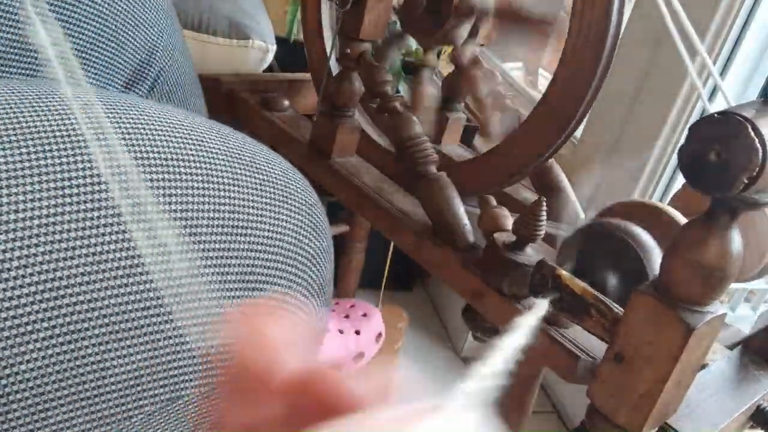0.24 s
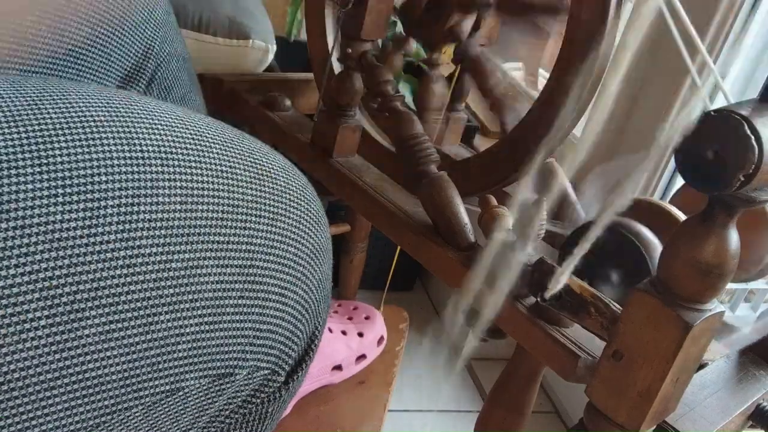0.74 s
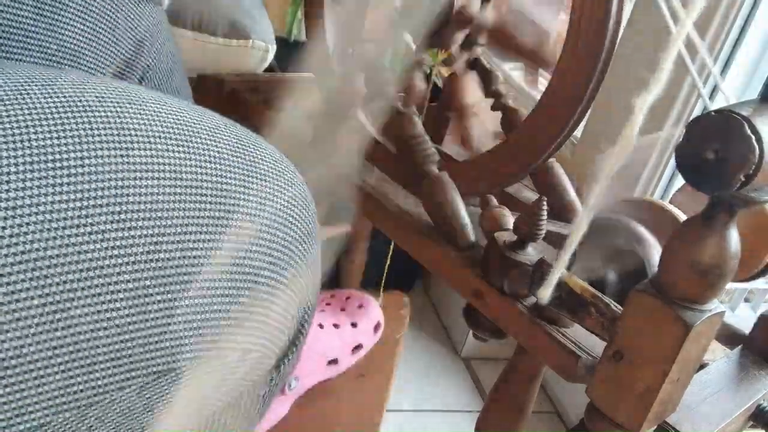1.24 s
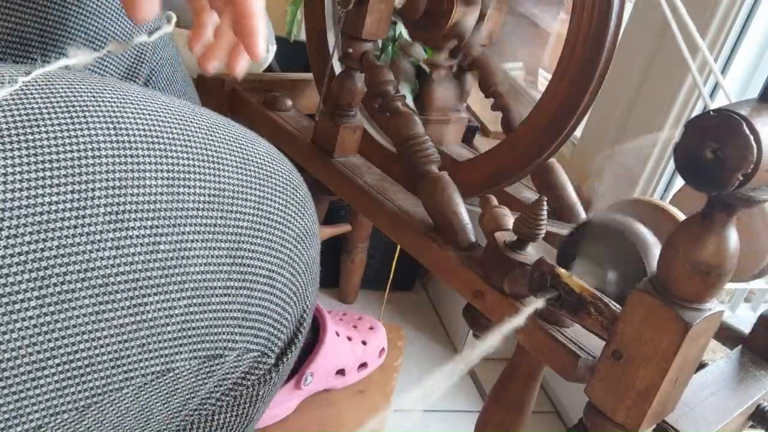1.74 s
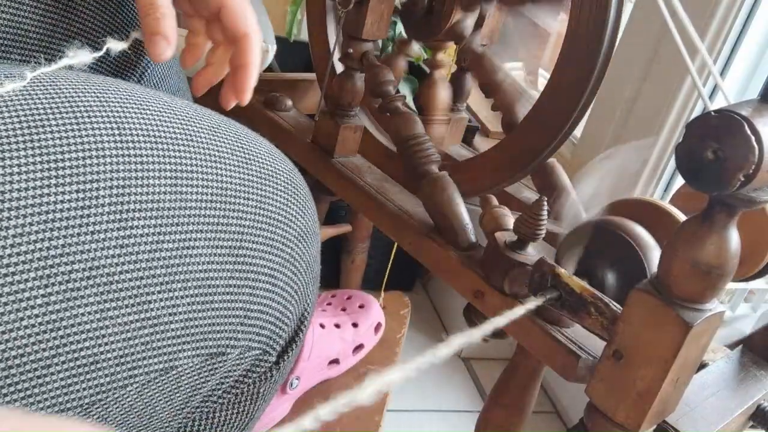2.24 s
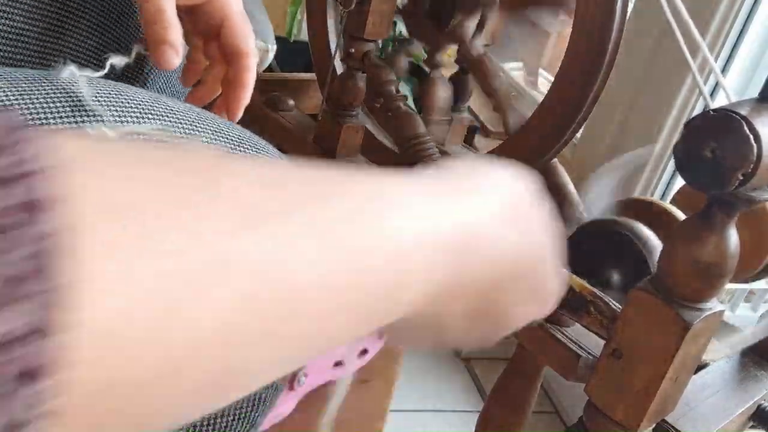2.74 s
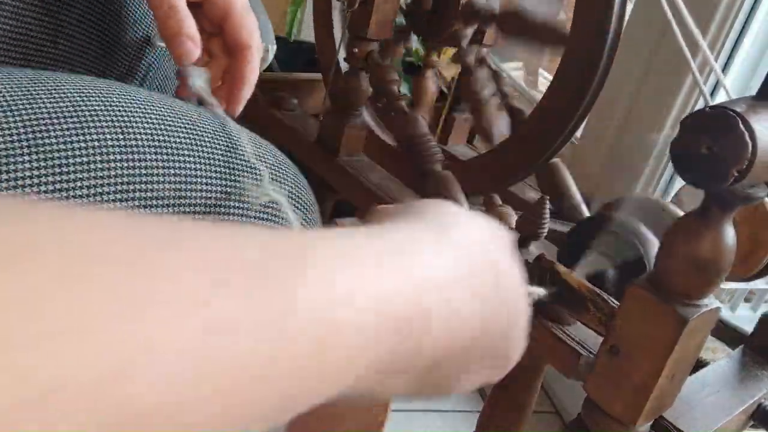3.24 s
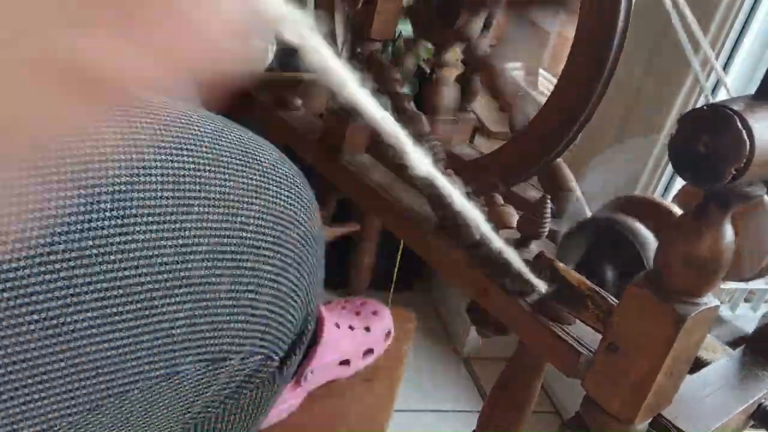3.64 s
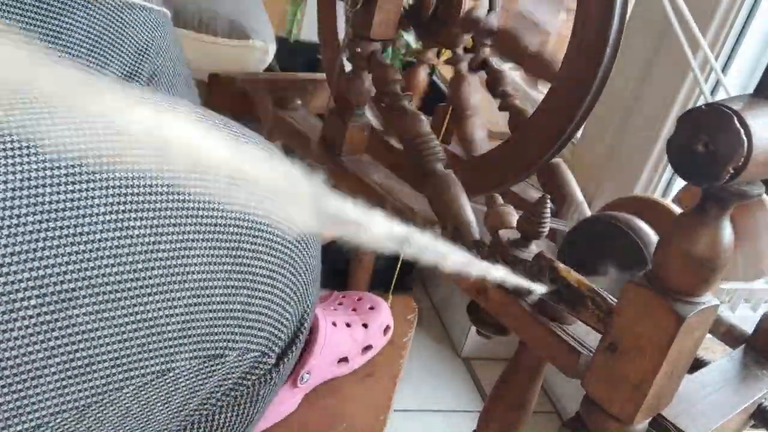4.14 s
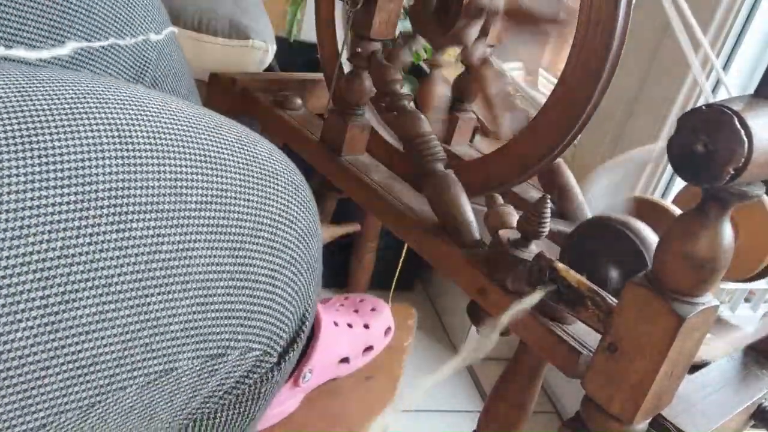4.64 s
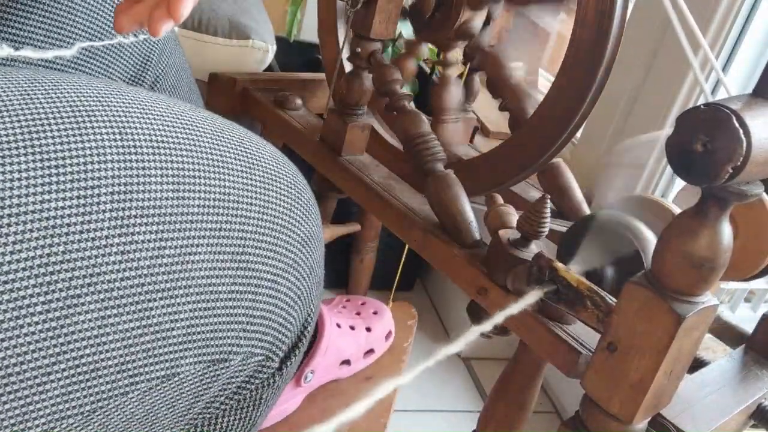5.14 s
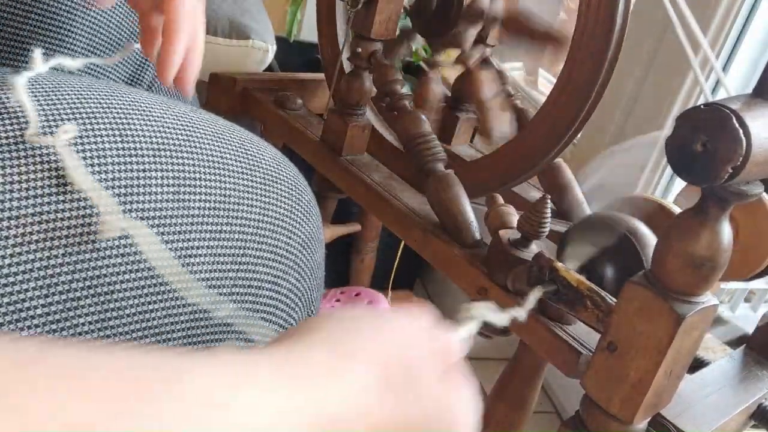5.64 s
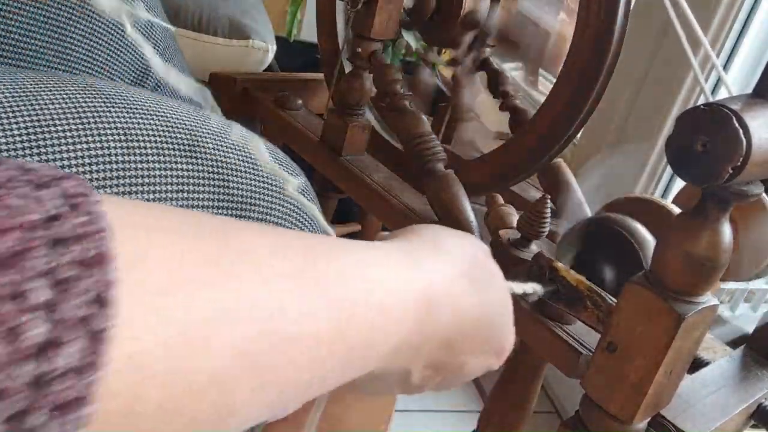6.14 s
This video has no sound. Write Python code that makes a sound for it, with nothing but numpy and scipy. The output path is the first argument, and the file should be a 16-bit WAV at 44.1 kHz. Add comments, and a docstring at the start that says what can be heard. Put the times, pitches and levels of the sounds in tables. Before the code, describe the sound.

A wooden treadle spinning wheel clatters unevenly indoors, with hollow knocks, sharp metal ticks, a low throbbing hum and soft yarn hiss.

```python
"""Wooden knocks, bright ticks, a throbbing hum and hissing yarn: a treadle spinning wheel in a small room.
Flyer and bobbin knock and metal fittings tick as impacts whose random bounces excite resonant modes.
Yarn hiss, bobbin rattle and frame rumble are friction noise, shaped by body or colour and paced by the treadle.
Narrow noise makes the frame hum, slow swings make thuds, and a wavering tone is a bearing that sings once.
Short room reflections follow the knocks and ticks; a quiet rumble of the house lies beneath."""
import sys
import numpy as np
from scipy import signal
from scipy.fft import rfft, irfft
from scipy.io import wavfile
from scipy.ndimage import uniform_filter1d

SR = 44100
rng = np.random.default_rng(int(sys.argv[2]) if len(sys.argv) > 2 else 0)


def dump_mix(stems):
    """Bounce the given channels to the path in sys.argv[1] as a 16-bit WAV at rate SR."""
    frames = np.atleast_2d(stems).T  # one column per channel
    limited = np.clip(frames, -1, 1)  # hard clip at full scale
    pcm = np.round(limited * 32767).astype(np.int16)
    wavfile.write(sys.argv[1], SR, pcm)


N = 282240
T = np.arange(N) / SR
SIZE = 16384  # filter length in samples
FREQS = np.maximum(np.fft.rfftfreq(SIZE, 1 / SR), 1)

# resonances of flyer and bobbin: centre_hz, width_hz, level_db (relative)
FLYER_MODES = [(423, 230, -9), (677, 67, -4.5), (865, 84, 4.5), (1110, 224, 2.5), (1282, 130, 2.5),
               (1600, 22, -6), (1745, 125, 3), (1901, 38, 4), (2106, 130, 5), (2276, 180, -0.5),
               (2522, 176, 5), (2840, 230, -2), (3240, 220, -5), (3490, 110, -1), (3890, 160, -2),
               (4260, 310, -3.5)]
# resonances of the wooden frame: centre_hz, width_hz, level_db (relative)
FRAME_MODES = [(157, 9.5, -11.5), (212.4, 17, -6), (276.1, 2.6, 7.5), (311.4, 20.5, 2), (370, 17, -3.5),
               (397.8, 17.5, 5), (424.5, 36, -1)]
# pushes of the treadle, one per turn of the wheel; levels before sag and throb:
# start_s (before lead), rise_s, length_s, rattle_db (bobbin), rumble_db (frame), hiss_db (yarn)
STROKES = [(-0.1, 0.13, 0.54, -49.5, -61, -45.5), (0.717, 0.32, 1, -48, -57, -44.5),
           (1.701, 0.11, 0.23, -51, -61, -47), (2.393, 0.2, 0.58, -51, -54, -48),
           (3.302, 0.23, 0.75, -46.5, -63, -40), (4.216, 0.17, 0.79, -51.5, -58.5, -52),
           (5.086, 0.28, 1, -52.5, -57.5, -49.5), (5.931, 0.39, 0.6, -51, -58.5, -48.5)]
FLYER_TURNS_PER_S = 9.2  # mean speed


def undb(db):
    """Level law: decibels to amplitude gain."""
    return 10 ** (np.asarray(db) / 20)


def unit(x):
    """Normalisation: scale to an rms of one."""
    return x / np.sqrt(np.mean(x ** 2))


def curve(table, axis=1):
    """Linear interpolation: one column of a time table at every sample."""
    rows = np.array(table)
    return np.interp(T, rows[:, 0], rows[:, axis])


def colour(points, axis=1):
    """Spectral envelope: gain from (Hz, dB) points, interpolated over log frequency."""
    rows = np.array(points)
    return undb(np.interp(np.log(FREQS), np.log(rows[:, 0]), rows[:, axis]))


def resonances(modes):
    """Modal superposition: gain of a body whose damped modes add in power."""
    power = 0
    for hz, width, db in modes:
        detuning = (FREQS ** 2 - hz ** 2) / (FREQS * width)
        power = power + undb(db) ** 2 / (1 + detuning ** 2)
    return np.sqrt(power)


def struck(modes):
    """Modal excitation: each blow lands elsewhere, favouring other modes and shifting them slightly."""
    spread_db, detune_share = 1.8, 0.0074
    chance = rng.standard_normal((len(modes), 2))
    varied = []
    for (hz, width, db), (shift, favour) in zip(modes, chance):
        varied.append((hz * (1 + detune_share * shift), width, db + spread_db * favour))
    return resonances(varied)


def ring(x, gain):
    """Causality: a minimum-phase filter with the given gain rings only after it is struck."""
    # folding the cepstrum onto positive time gives the minimum phase
    cepstrum = irfft(np.log(gain + 1e-6))[:SIZE // 2]
    cepstrum[1:] *= 2
    response = irfft(np.exp(rfft(cepstrum, SIZE)))[:SIZE // 2]
    return signal.fftconvolve(x, response[None], axes=1)[:, :x.shape[1]]


def walk(rate):
    """Random modulation: smooth wander, about `rate` new values a second, with a spread near one."""
    k = int(SR / rate)
    steps = np.repeat(rng.standard_normal(N // k + 1), k)
    return unit(uniform_filter1d(steps, k)[:N])


def add(track, s, sound):
    """Superposition: mix a sound into a track at a time in seconds."""
    i = np.clip(int(s * SR), 0, N)
    track[:, i:i + sound.shape[1]] += sound[:, :N - i]


def contact(rise_s, t60, bounce_rate, scatter_t60, direct):
    """Impact: a loose part lands and chatters in random, fading bounces; each sounds direct, then scattered."""
    port_lag_s = 0.00013  # the direct sound reaches the left port first
    t = T[:SIZE // 4]
    bounces = (rng.random(len(t)) < bounce_rate / SR) * rng.standard_normal(len(t)) * 0.5
    bounces = bounces * np.exp(-np.log(1000) * t / t60)
    bounces[0] = 1
    growth = 1 - np.exp(-t / rise_s)
    decay = np.exp(-np.log(1000) * t / scatter_t60)
    scatter = unit(rng.standard_normal((2, len(t))) * growth * decay)
    scatter[0, 0] += direct * np.sqrt(len(t))
    scatter[1, int(port_lag_s * SR)] += direct * np.sqrt(len(t))
    return signal.fftconvolve(scatter, bounces[None], axes=1)[:, :len(t)]


def blow(x, db):
    """Impact energy: give a blow the energy of that level held for ten milliseconds."""
    return x * undb(db) / np.sqrt(np.sum(x ** 2) / (SR / 100))


def friction(rate, spread_db, t60, smooth):
    """Friction: noise swells with countless tiny slips of unequal size over a smooth rub."""
    sizes = undb(spread_db * np.minimum(rng.exponential(size=N), 4))
    slips = (rng.random(N) < rate / SR) * sizes
    decay = np.exp(-2 * np.log(1000) * T[:SIZE // 4] / t60)
    power = signal.fftconvolve(slips ** 2, decay)[:N]
    return rng.standard_normal((2, N)) * np.sqrt(np.abs(power / power.mean()) + abs(smooth))


def treadle(levels_db, coast_db, sag_db_per_s, lead_s):
    """Forced drive: gain swells with each push, sags, then falls to the coasting level at release."""
    release_db_per_s = 109  # further fall once the foot lets up
    power = undb(coast_db) ** 2
    for (s, rise_s, length_s, *_), db in zip(STROKES, levels_db):
        t = T - s + lead_s
        sag_db = sag_db_per_s * np.maximum(t - rise_s, 0)
        fade_db = sag_db + release_db_per_s * np.maximum(T - s - length_s, 0)
        power = power + (np.clip(t / rise_s, 0, 1) * undb(db - fade_db)) ** 2
    return np.sqrt(power)


def looseness():
    """Driven play: how hard the bobbin shakes on its spindle, as a gain."""
    return treadle([row[3] for row in STROKES], coast_db=-61.5, sag_db_per_s=24, lead_s=0.0059)


def wobble():
    """Rotating imbalance: the swing of the flyer, between -1 and 1 once a turn, at a wandering speed."""
    speed = FLYER_TURNS_PER_S * (1 + 0.1123 * walk(4.04))
    return np.sin(2 * np.pi * np.cumsum(speed) / SR)


def knocks():
    """Impact on modes: flyer and bobbin hit the ends of their play, chatter, rebound and wake the frame."""
    # wooden knocks in the bearings:
    # start_s, level_db, body_db (low body), edge_db (hard edge), frame_db (level of the frame's ring)
    knock_rows = [(0.017, -49, 7, -4, -57), (0.066, -47.5, 2.0, 2.5, -54), (0.116, -45.5, 6, -5, -45),
                  (0.1752, -40, 11, -8, -57), (0.199, -40.5, 1, -4, -52), (0.241, -46.5, 9, -4.5, -57),
                  (0.3425, -39.5, 7.0, 3, -56), (0.41, -45, -1.5, 2, -59), (0.4582, -43.5, 2.5, -5, -53.0),
                  (0.532, -49, 16, -6, -52.5), (0.8426, -33, 1, 4, -42), (0.895, -43, -2, -4, -53),
                  (0.9462, -25, -7, -0.5, -40), (0.9895, -30, -0.0, 0.0, -44.5),
                  (1.0378, -25.5, -7.5, -1, -50), (1.08, -31, -7.5, 2.5, -43), (1.135, -21, -14, -3, -47),
                  (1.1835, -32.5, -5, 4, -44.0), (1.2451, -26.5, 0, -1.5, -49),
                  (1.3025, -31.5, 2, 2.5, -52), (1.3778, -26.5, -3.5, -2, -44.5),
                  (1.747, -28.5, 2.5, -1.5, -45.0), (1.8132, -39.5, 1, 3, -48), (1.8418, -38, 3.0, 2, -59),
                  (1.888, -39, 2, 6, -56), (1.9061, -35.5, 4, -3.5, -47.5), (1.9444, -39.5, -5, -16, -55),
                  (2.0101, -44, 19, -0.5, -47), (2.0646, -24, -12.5, -2.5, -48), (2.0956, -39, 0, 8, -46),
                  (2.3531, -45, 12, -4.0, -49.5), (2.5874, -34, 3, 3, -40), (2.657, -31, 1, -1, -46),
                  (2.7599, -32, -3.0, -17, -42), (2.8182, -27.5, -5.5, 2, -48), (2.9161, -41, 8, -6, -51),
                  (2.9861, -41.5, 3.0, -10, -52), (3.3481, -44, 0, -11, -58), (3.3751, -28, -3, -2, -50.0),
                  (3.461, -36.5, -3, -11, -47.5), (3.524, -35.5, 2, 2, -44.5),
                  (3.5549, -33.5, 0, -3.0, -53), (3.604, -35.5, 9, -2, -52), (3.6418, -37, 0, 2, -53),
                  (3.6704, -26, -7, -2, -47.5), (3.7158, -37.0, 1, -3.0, -45.5),
                  (3.7726, -24.5, -2, -4, -44.0), (3.8276, -29, -6, 0.5, -51),
                  (3.8939, -24, -3, -3.5, -40.5), (3.9607, -28.5, -6, 1, -49),
                  (4.0465, -30.5, 5.5, -5, -49), (4.1356, -35.5, 1, -1, -57),
                  (4.2524, -30.5, 2.5, -11, -50), (4.3412, -40.5, -1, 0.0, -56), (4.378, -42, -1, 4, -55),
                  (4.4188, -40, 3, -5, -51), (4.496, -30, -0.5, -3, -44.5), (4.5724, -44, 6, 7, -52),
                  (4.632, -26, -6, 0, -46.5), (4.7055, -41.0, 0, -9, -53), (4.7947, -36.5, 4.5, -6, -50.5),
                  (5.0836, -36, 5.5, -6, -49), (5.21, -38.5, 5.5, -4, -46.5), (5.298, -43, -2, -7, -66),
                  (5.4, -47, 11, 0, -47.5), (5.4479, -34.5, 1, 4, -51), (5.5051, -32.5, 0, -1.5, -52),
                  (5.5815, -40, 5.5, -6.0, -44), (5.6215, -44.5, 3.5, 0, -45), (5.7757, -33, -10.5, 1, -51),
                  (5.816, -37, 4.0, 1.5, -46.5), (5.9901, -31.5, -2, -3, -59),
                  (6.1, -40.0, 10, -1.0, -45.5), (6.2078, -40.5, 0, 0.5, -49.5),
                  (6.277, -32.5, -3.5, -4, -46), (6.3178, -40, 3.5, 9, -58), (6.383, -34.5, -8, -10.5, -52)]
    chatter_spread = 0.25  # log spread of the chatter time
    rebound_s, rebound_db = 0.022, -16  # mean wait, level relative to the knock
    out = np.zeros((2, N))
    frame_gain = resonances(FRAME_MODES) * colour([(450, -1), (1500, -22.5)])
    for s, db, body_db, edge_db, frame_db in knock_rows + taps():
        hardness = colour([
            (300, min(body_db, 0) - 7), (700, body_db - 2), (1250, body_db), (1650, -0.5), (2300, 1),
            (2900, 0.5), (3800, edge_db - 0.5), (6000, edge_db - 2.5), (11000, -8)])
        linger = np.exp(chatter_spread * rng.standard_normal())
        hit = contact(rise_s=0.00048, t60=0.029 * linger, bounce_rate=500,
                      scatter_t60=0.031 * linger, direct=0.55)
        wood = ring(hit, (struck(FLYER_MODES) + undb(-18.5)) * hardness)
        add(out, s, blow(wood, db))
        rebound = ring(hit, struck(FLYER_MODES) + undb(-17))
        add(out, s + rebound_s * (0.5 + rng.random()), blow(rebound, db + rebound_db))
        add(out, s, blow(ring(hit, frame_gain), frame_db))
    return out


def taps():
    """Rotating contact: knock rows of light taps, about one a flyer turn, as loud as the play allows."""
    tap_db = 3  # over the rattle
    count = int(N / SR * FLYER_TURNS_PER_S)
    turns = np.arange(count) + 0.5 + 0.27 * rng.standard_normal(count)
    times = np.clip(turns / FLYER_TURNS_PER_S, 0, T[-1])
    levels = 20 * np.log10(np.interp(times, T, looseness())) + tap_db
    return [(s, db, 0, -3, db - 12) for s, db in zip(times, levels)]


def ticks():
    """Hard impact: metal spindle and hooks snap on their seats, short and bright, with a trace of ring."""
    # ticks, often just before the wood lands: start_s, level_db
    tick_rows = [(0.011, -31.5), (0.1027, -34), (0.1112, -24.5), (0.1974, -31), (0.291, -31), (0.38, -33.5),
                 (0.3844, -29.5), (0.527, -32.5), (0.685, -34), (0.9455, -35.5), (1.033, -38), (1.077, -30),
                 (1.104, -36.5), (1.1337, -32), (1.152, -33.5), (1.1802, -30.5), (1.2986, -30),
                 (1.4503, -33.5), (1.8908, -40), (2.002, -29.5), (2.0615, -28.5), (2.122, -37.5),
                 (2.2695, -34.5), (2.423, -43.5), (2.464, -28.5), (2.5846, -25.5), (2.7561, -26),
                 (2.814, -33.5), (2.8434, -29), (3.172, -35.5), (3.296, -42.5), (3.371, -31), (3.441, -37),
                 (3.458, -29.5), (3.6663, -33), (3.7123, -35), (3.7682, -27.5), (3.822, -26.5),
                 (3.8886, -28.5), (3.956, -25.5), (4.041, -32.5), (4.13, -31.5), (4.2457, -34.5),
                 (4.3376, -36.5), (4.4223, -37), (4.4911, -28), (4.6179, -29), (4.631, -33), (4.844, -45.5),
                 (5.397, -27), (5.4547, -37), (5.506, -43), (5.6629, -30), (5.697, -33.0), (5.771, -31.5),
                 (6.3195, -41)]
    # resonances of the metal fittings: centre_hz, width_hz, level_db (relative)
    metal_modes = [(6220, 360, 5.5), (8700, 79, 3), (8640, 62, -14), (9130, 22, 12), (10550, 330, 6.5),
                   (11800, 230, -2)]
    # spectrum of the snap: frequency_hz, level_db (relative)
    snap_colour = [(200, -20), (1000, -15.5), (3000, -8), (5000, -5), (7000, -3.5), (8500, 2.5), (12000, 5),
                   (15000, -4.5)]
    out = np.zeros((2, N))
    for s, db in tick_rows:
        hit = contact(rise_s=.0005, t60=.028, bounce_rate=500, scatter_t60=.018, direct=.36)
        # a flat floor below the modes keeps the snap stronger than most of its ring
        metal = np.hypot(struck(metal_modes), undb(6.0))
        add(out, s, blow(ring(hit, colour(snap_colour) * metal), db))
    return out


def yarn(flyer):
    """Sliding friction: twisting wool hisses through orifice and hooks, louder with each push and turn."""
    # spectrum of the hiss: frequency_hz, level_db (relative)
    hiss_colour = [(1000, -26), (3000, 0), (5000, 0), (7000, 3), (8800, 4.5), (12000, 8.5), (15000, 0)]
    scrape_db = 2.5  # swing of the level, once a turn of the flyer
    fibres = friction(rate=240, spread_db=2.6, t60=0.1, smooth=0.6)
    pull = treadle([row[5] for row in STROKES], coast_db=-56.0, sag_db_per_s=19.0, lead_s=0.049)
    return unit(ring(fibres, colour(hiss_colour))) * pull * undb(scrape_db * flyer)


def bobbin():
    """Friction on modes: the bobbin rattles lightly on its spindle between the knocks."""
    rattle = friction(rate=120, spread_db=4.5, t60=0.05, smooth=0.086)
    return unit(ring(rattle, resonances(FLYER_MODES) + undb(-25.5))) * looseness()


def frame(flyer):
    """Forced vibration: rolling friction rumbles through the frame, whose low sway hums with each push."""
    # low sway, its gain squared below: centre_hz, width_hz, level_db (relative, before squaring)
    sway_modes = [(95, 15, -1.5), (109.7, 9.8, 3.5)]
    hum_db, hum_coast_db = -64, -73  # under the foot and between pushes, before sag and throb
    throb_db, rumble_throb_db = 2.5, 2.5  # swing of hum and rumble, once a turn of the flyer
    roll = friction(rate=510, spread_db=4.5, t60=0.047, smooth=0.19)
    rumble = unit(ring(roll, resonances(FRAME_MODES)))
    sway = signal.hilbert(ring(rng.standard_normal((1, N)), resonances(sway_modes) ** 2))
    # the drive keeps the swing nearly even while its pitch wavers
    hum = unit(sway.real / (np.abs(sway) + 1.1 * sway.real.std()))
    load = treadle([row[4] for row in STROKES], coast_db=-67.5, sag_db_per_s=11.5, lead_s=0.0025)
    swing = treadle([hum_db] * len(STROKES), coast_db=hum_coast_db, sag_db_per_s=7.5, lead_s=0.0088)
    throbbing_rumble = rumble * load * undb(rumble_throb_db * (flyer - 1.5))
    return throbbing_rumble + hum * swing * undb(throb_db * flyer)


def thuds():
    """Damped oscillation: treadle and unbalanced flyer rock the frame in slow swings that swell and die."""
    # low thuds: start_s, level_db (rms at the widest swing)
    thud_rows = [(0.105, -56), (0.295, -56), (0.405, -53), (0.525, -58), (0.89, -53), (0.94, -56),
                 (1.01, -52.5), (1.177, -59), (1.245, -57), (1.365, -60), (1.454, -51.5), (1.743, -49.5),
                 (1.82, -60), (1.995, -57), (2.575, -59), (2.654, -55.5), (3.005, -57), (3.465, -55),
                 (3.548, -54), (3.652, -52), (3.765, -61), (3.904, -57), (3.968, -58), (4.047, -57.5),
                 (4.492, -49), (4.56, -54), (4.665, -57.5), (5.336, -49.5), (5.389, -52), (5.458, -67),
                 (5.578, -59), (5.697, -57), (6.21, -51.5)]
    rock_hz, detune_share, swell_s = 107.4, 0.036, 0.027  # mean pitch, its scatter, time to widest swing
    out = np.zeros((2, N))
    t = T[:SIZE]
    swell = (t / swell_s * np.exp(1 - t / swell_s)) ** 2
    for (s, db), chance in zip(thud_rows, rng.standard_normal(len(thud_rows))):
        swing = unit(np.sin(2 * np.pi * rock_hz * (1 + detune_share * chance) * t))
        add(out, s, undb(db) * (swell * swing)[None])
    return out


def squeak():
    """Stick-slip: a dry bearing sings unevenly near one pitch, swelling until it lets go."""
    # course of the squeak: time_s, level_db, pitch_hz (before its waver)
    squeak_rows = [(3.225, -76, 530), (3.25, -72, 530), (3.315, -57.5, 533), (3.365, -55, 535),
                   (3.395, -50, 536), (3.42, -62, 533), (3.44, -76, 536)]
    sounding = (T > squeak_rows[0][0]) & (T < squeak_rows[-1][0])
    pitch = curve(squeak_rows, axis=2) * (1 + 0.0057 * walk(140))
    phase = 2 * np.pi * np.cumsum(pitch) / SR
    tone = unit(np.sin(phase) * undb(1.7 * walk(70)))
    return tone * sounding * undb(curve(squeak_rows, axis=1))


def room(x, t60, wet_db, treble_db):
    """Reverberation: nearby floor and walls answer within milliseconds and fade exponentially."""
    t = T[:SR // 2]
    onset = np.clip(t / 0.0043, 0, 1) ** 2
    tail = rng.standard_normal((2, len(t))) * np.exp(-np.log(1000) * t / t60) * onset
    wet = signal.fftconvolve(x, unit(tail) / np.sqrt(len(t)), axes=1)[:, :N]
    return x + undb(wet_db) * ring(wet, colour([(500, 5.0), (2000, -1.0), (10000, treble_db)]))


def background():
    """Coloured noise: the quiet rumble of the house, its level wandering slowly."""
    # spectrum of the rumble: frequency_hz, level_db (relative)
    house_colour = [(15, 10.5), (25, -1), (60, -3.5), (100, -2), (170, -11), (400, -15), (900, -20.5),
                    (2000, -20.5), (6000, -37), (15000, -25)]
    noise = rng.standard_normal((2, N))
    return unit(ring(noise, colour(house_colour))) * undb(-55.5 + 1.6 * walk(4.1))


def scene():
    """Superposition: the wheel, its impacts answered by the room, over the rumble of the house."""
    air = background()
    clatter = room(knocks() + ticks(), t60=0.29, wet_db=-7.5, treble_db=-1.0)
    flyer = wobble()
    return clatter + yarn(flyer) + bobbin() + frame(flyer) + thuds() + squeak() + air


def record(dry):
    """Stereo pickup: side is narrowed most in the bass, each port has its own response, the top is cut."""
    # response of two microphone ports: frequency_hz, left_db, right_db
    port_colour = [(730, 4.5, 3.5), (1260, 1, -3), (1950, 2, 2), (5300, -0.5, 1), (7710, 1, 1.5),
                   (8400, 3, 9), (8890, 1.5, 10), (9840, 3.5, -1.5), (11800, 4.5, -10.5), (13000, -1, -10),
                   (13800, 2, -9), (14600, -3, -12)]
    # gain of the side signal: frequency_hz, side_db
    side_colour = [(25, 0), (60, -5), (110, -8.5), (380, -8.5), (700, -4.5), (1300, -0.5), (4000, -0.5)]
    top_hz = 14250
    mid = (dry[:1] + dry[1:]) / 2
    side = ring((dry[:1] - dry[1:]) / 2, colour(side_colour))
    left = ring(mid + side, colour(port_colour, axis=1))
    right = ring(mid - side, colour(port_colour, axis=2))
    top_cut = signal.ellip(8, .2, 70, top_hz, fs=SR, output="sos")
    return signal.sosfilt(top_cut, np.vstack([left, right]))


dry = scene()
out = record(dry)
dump_mix(out)
```